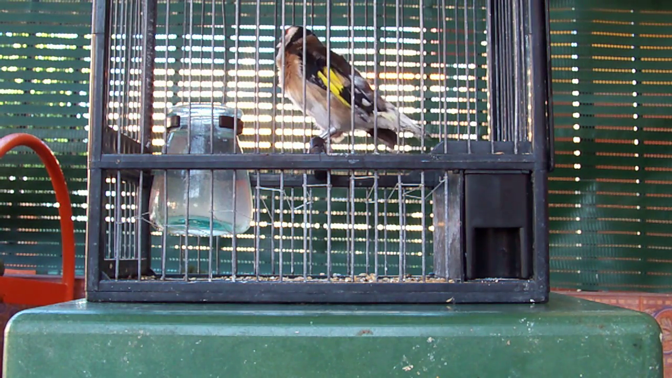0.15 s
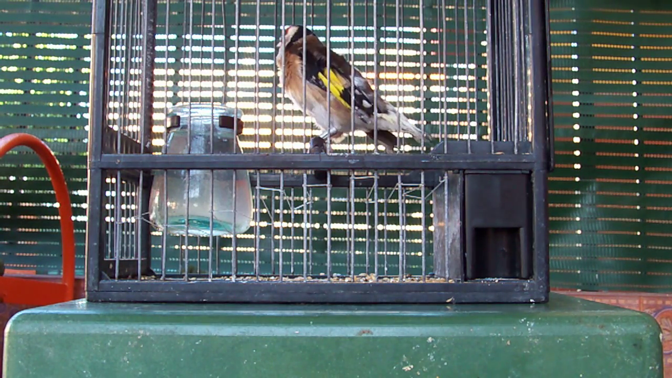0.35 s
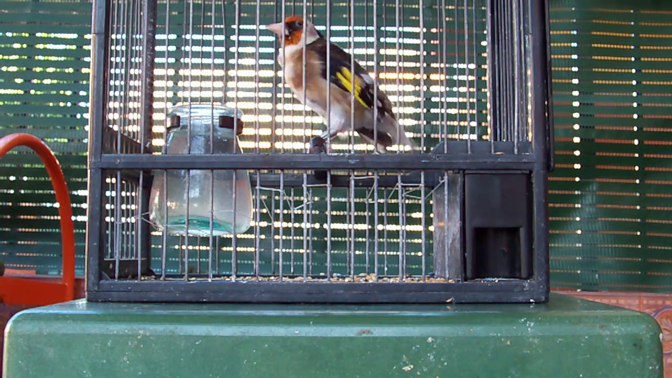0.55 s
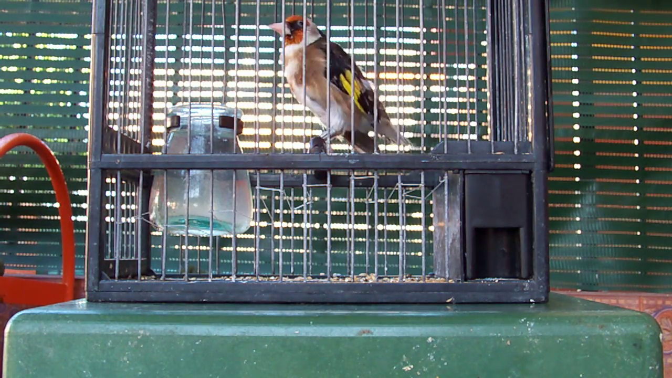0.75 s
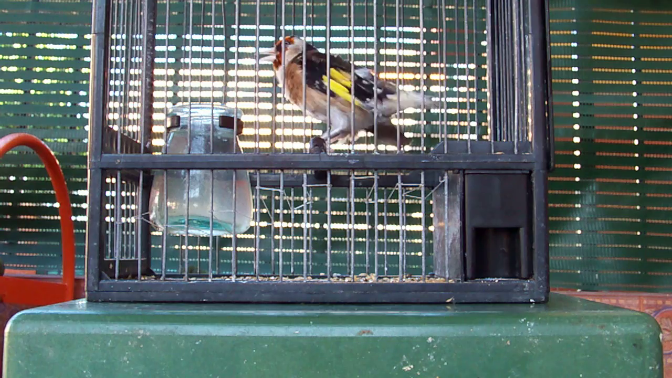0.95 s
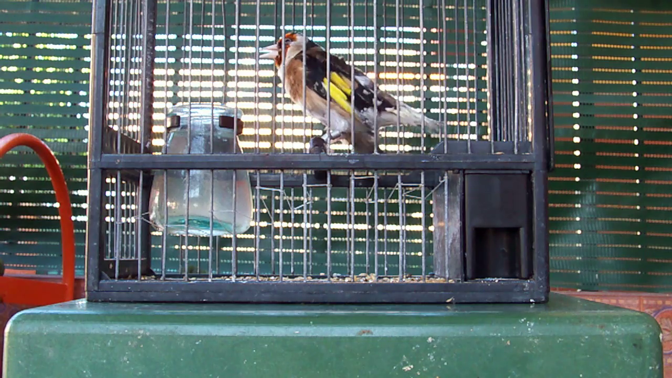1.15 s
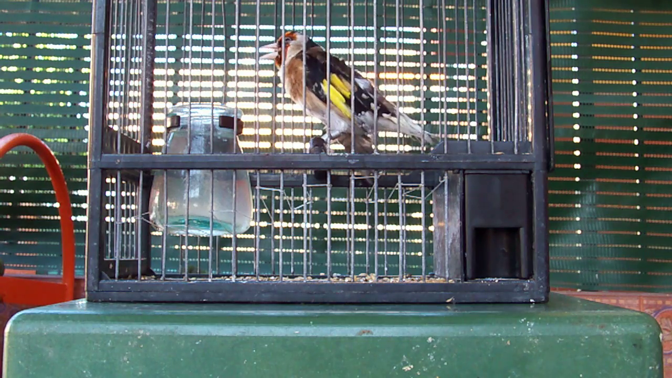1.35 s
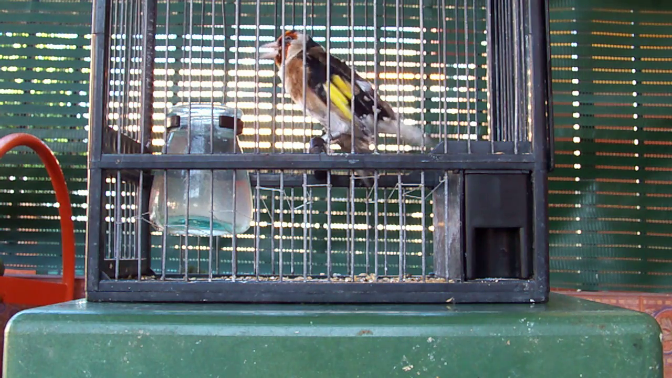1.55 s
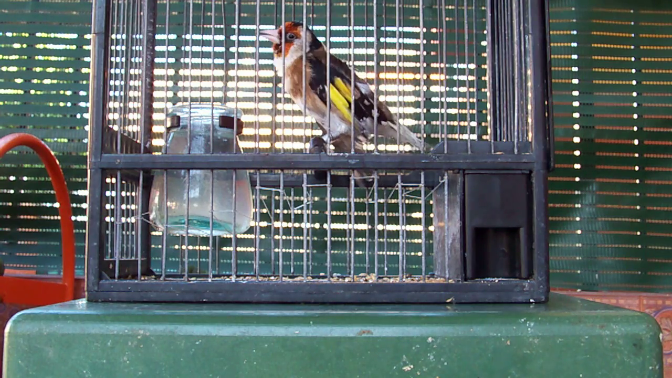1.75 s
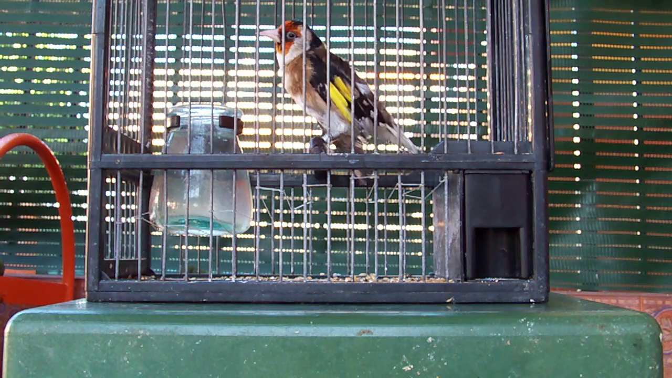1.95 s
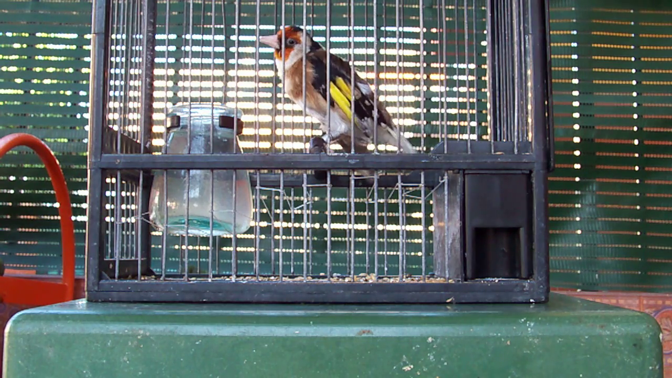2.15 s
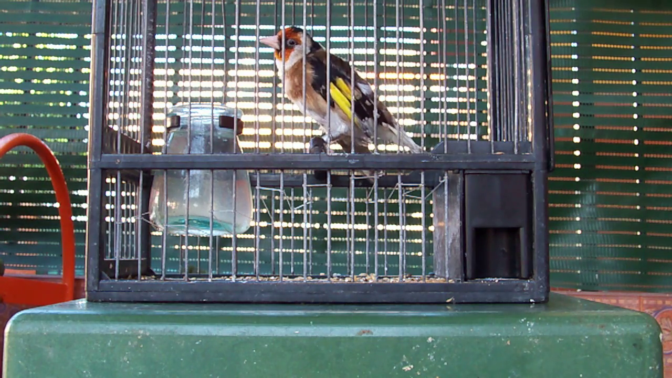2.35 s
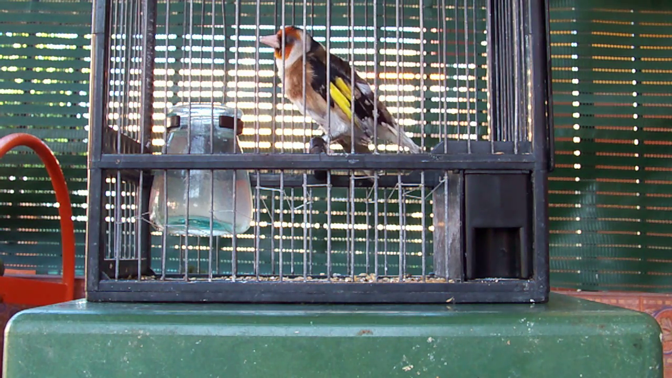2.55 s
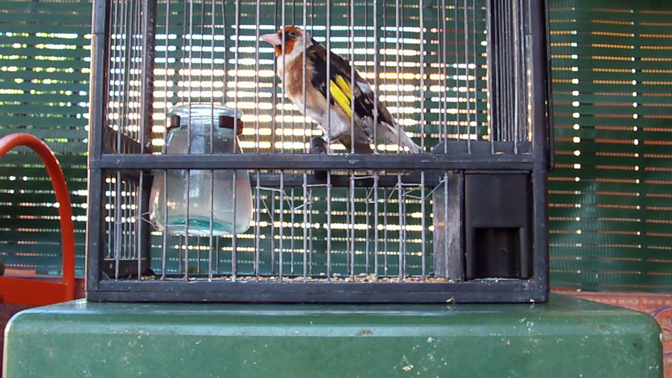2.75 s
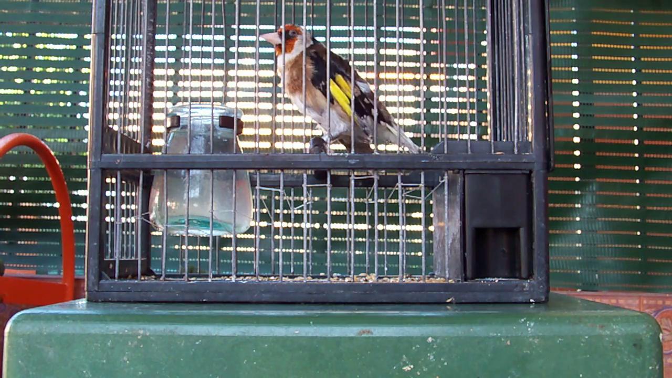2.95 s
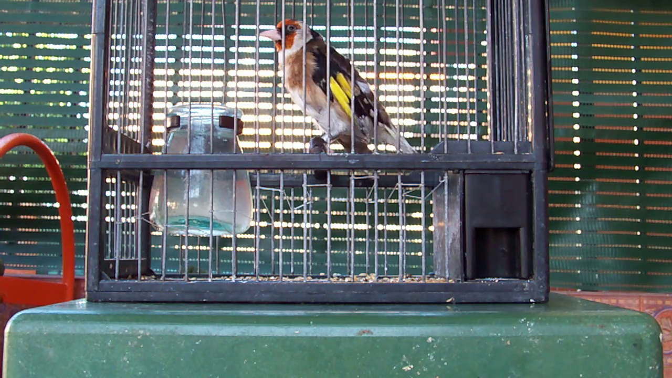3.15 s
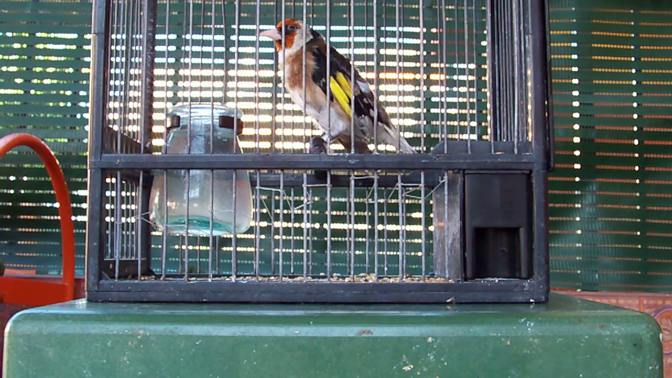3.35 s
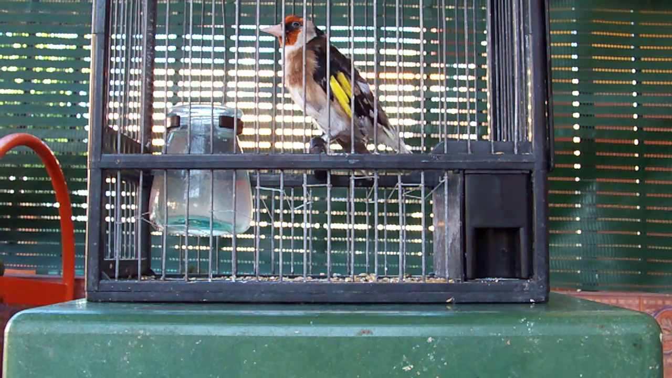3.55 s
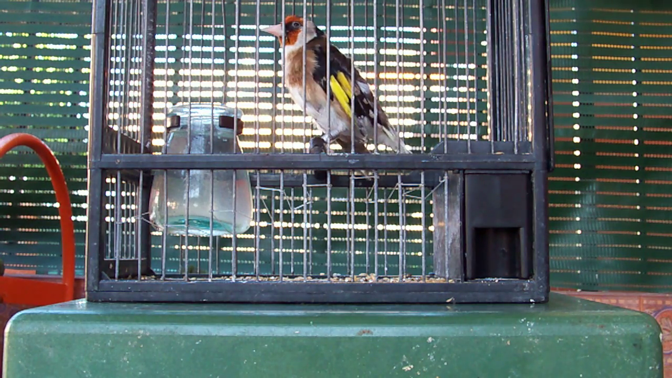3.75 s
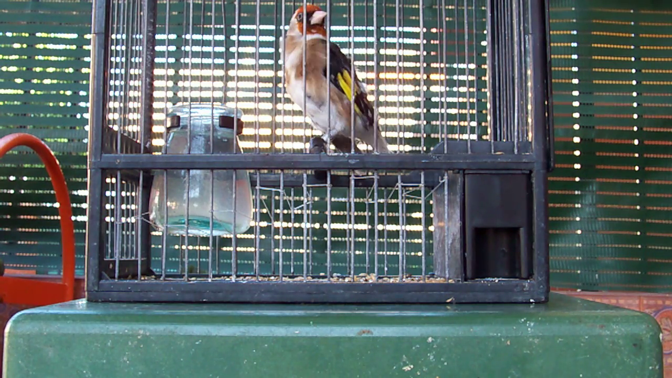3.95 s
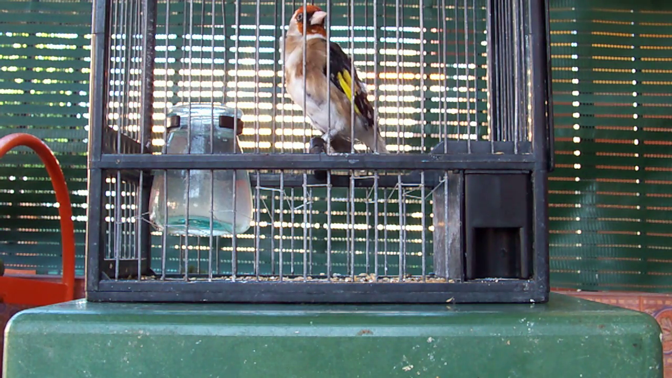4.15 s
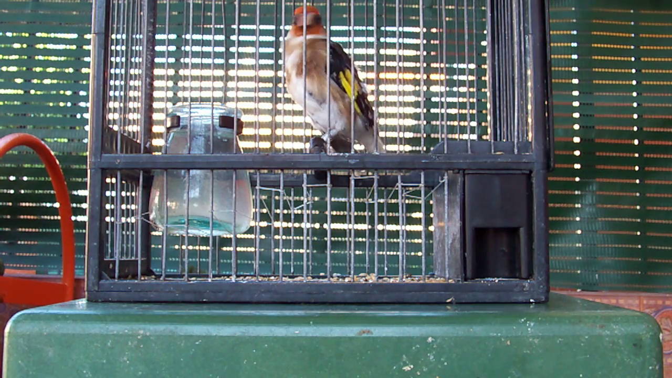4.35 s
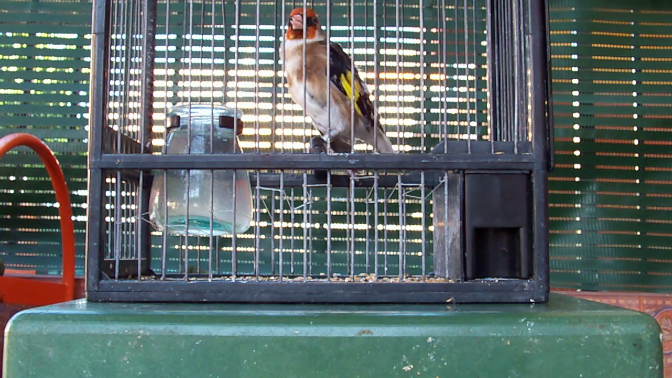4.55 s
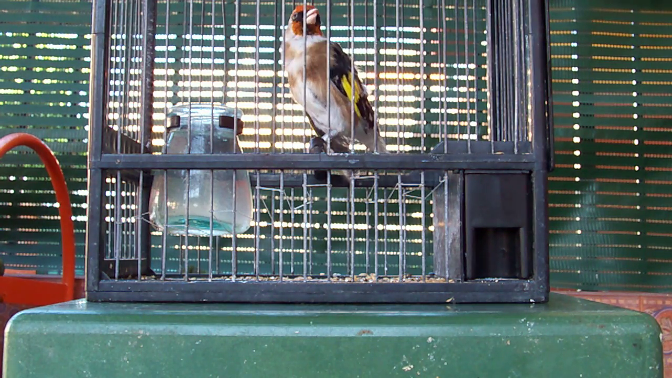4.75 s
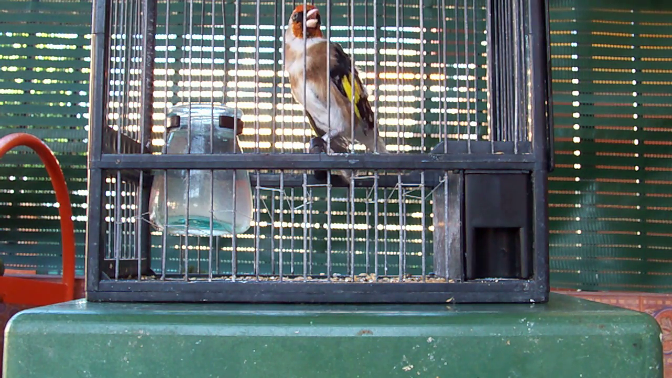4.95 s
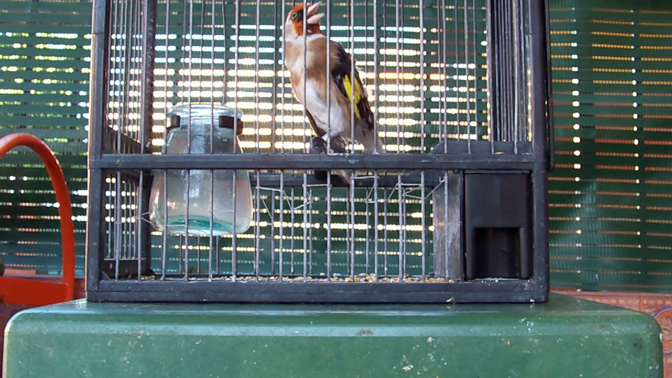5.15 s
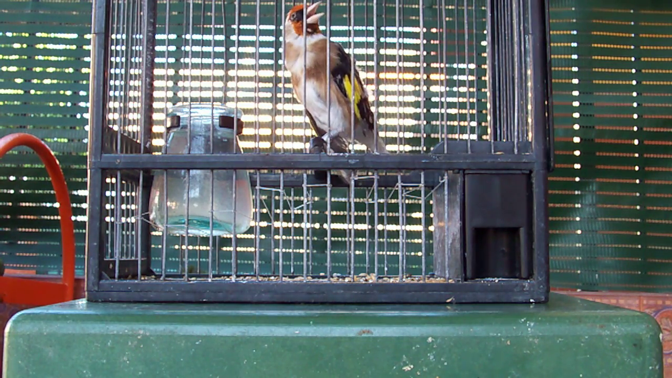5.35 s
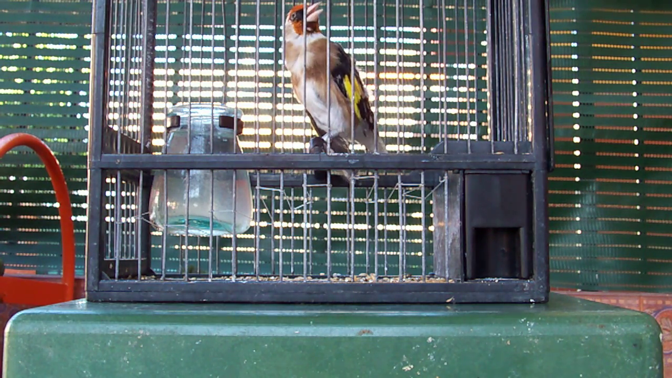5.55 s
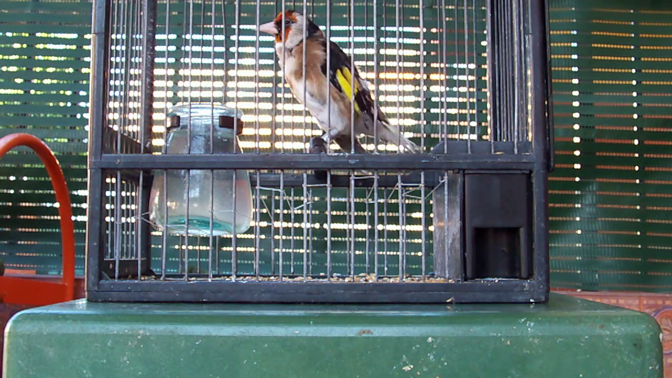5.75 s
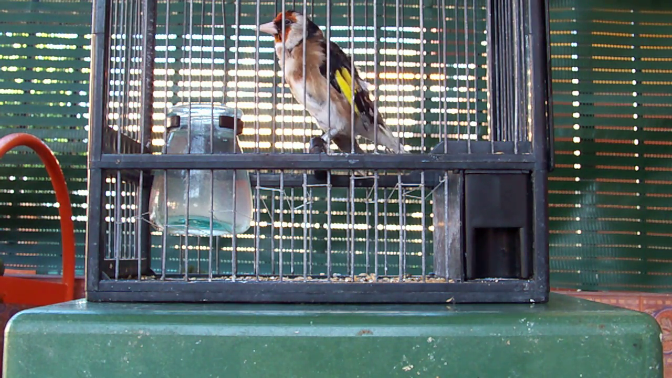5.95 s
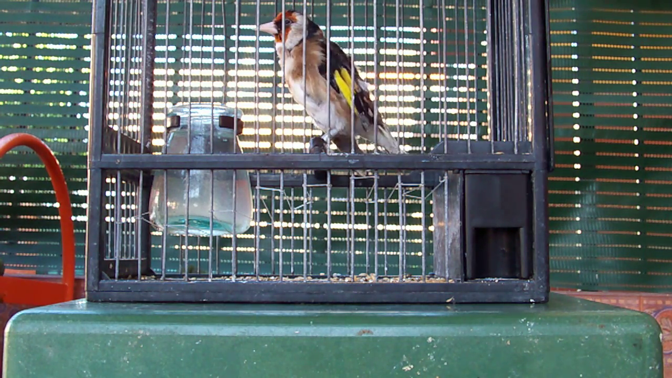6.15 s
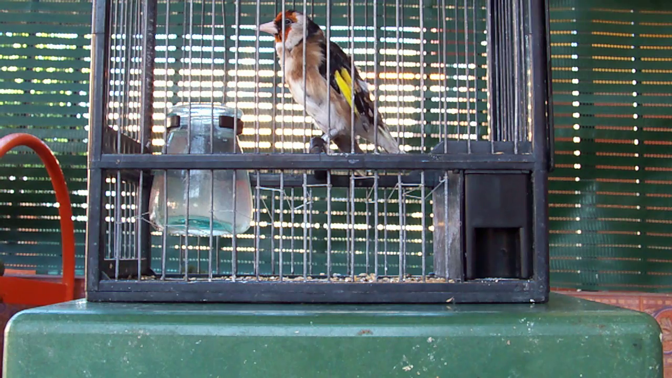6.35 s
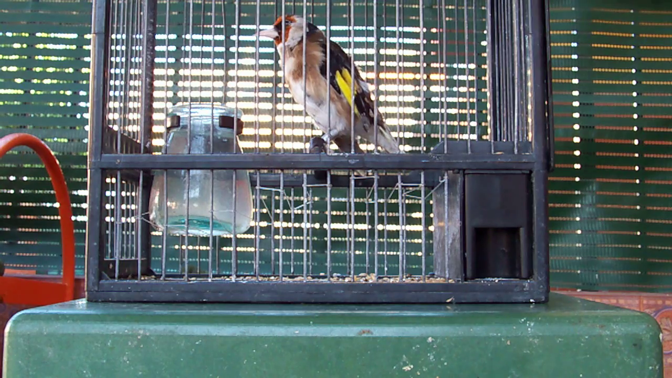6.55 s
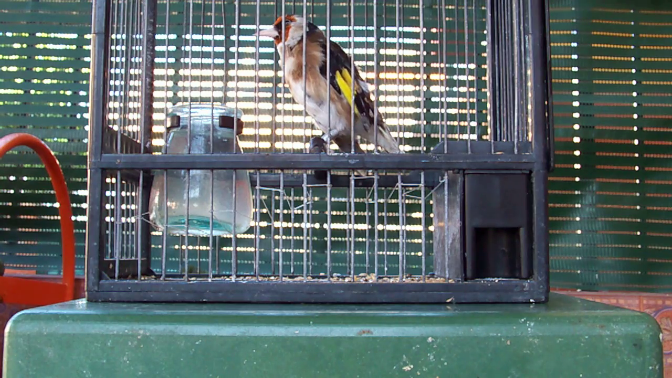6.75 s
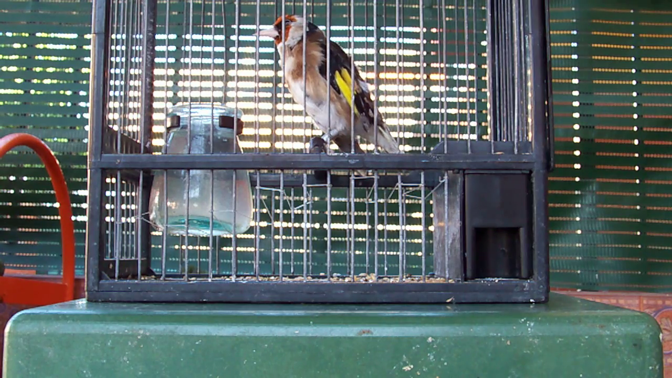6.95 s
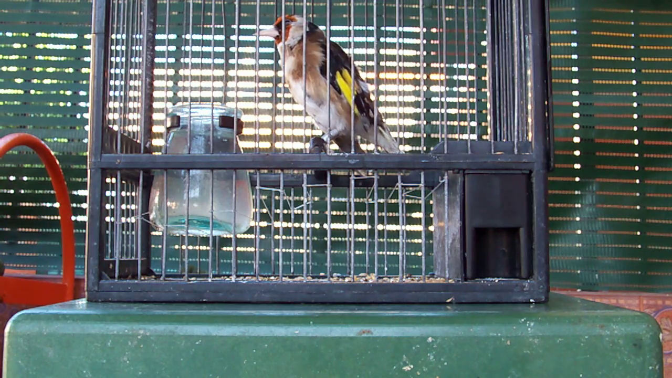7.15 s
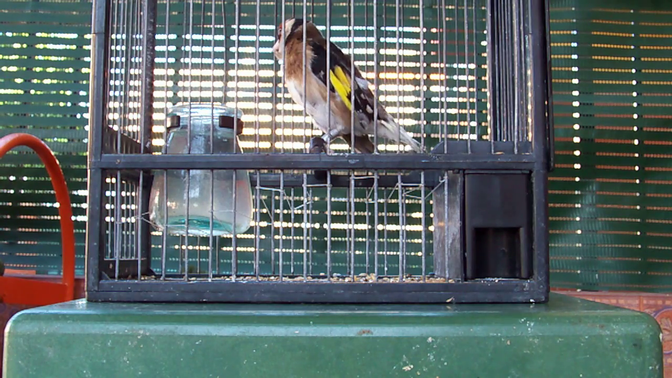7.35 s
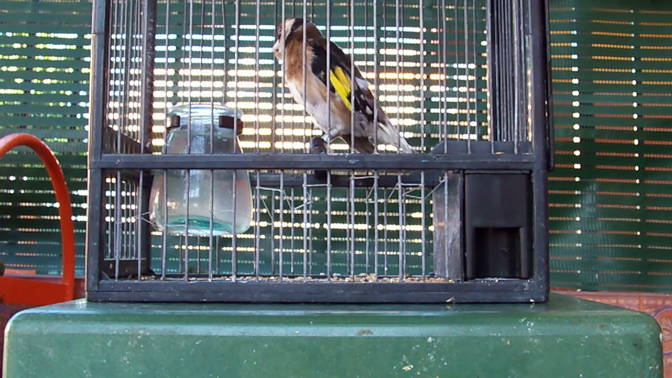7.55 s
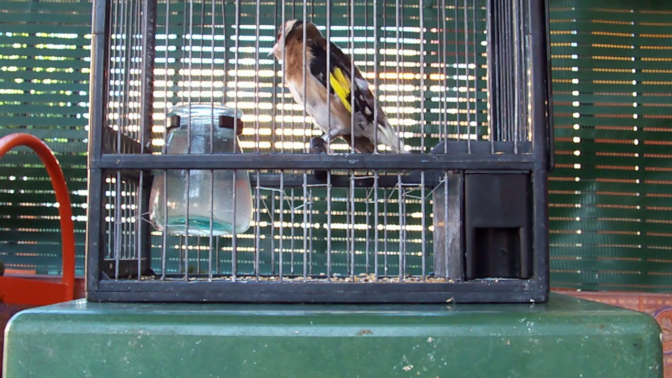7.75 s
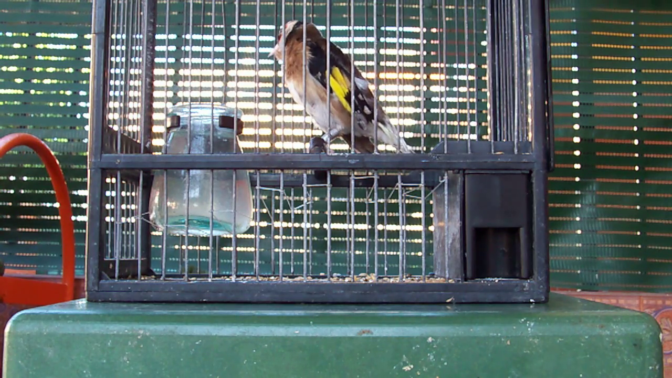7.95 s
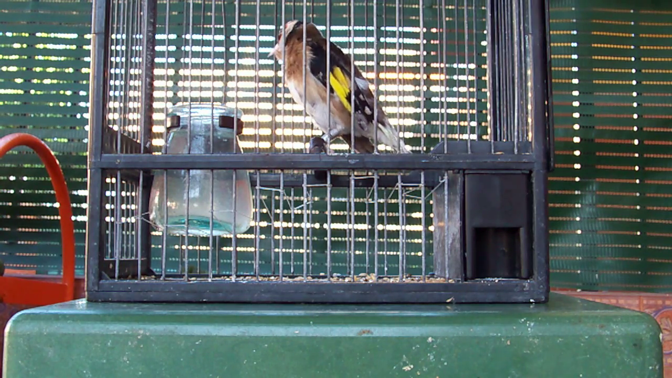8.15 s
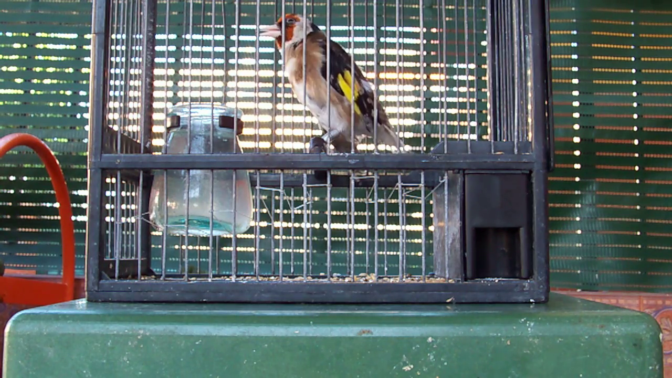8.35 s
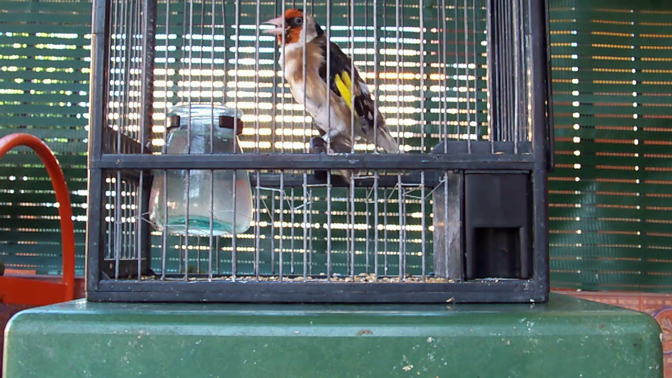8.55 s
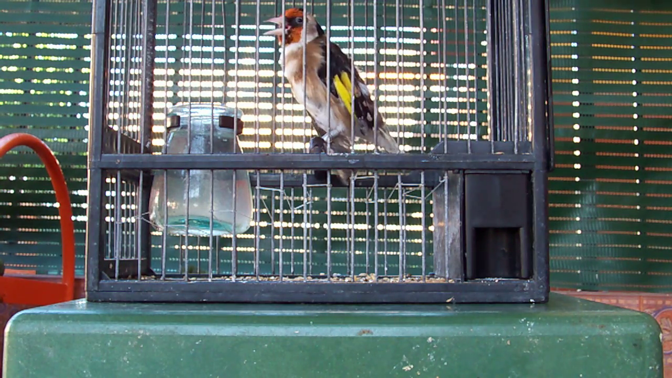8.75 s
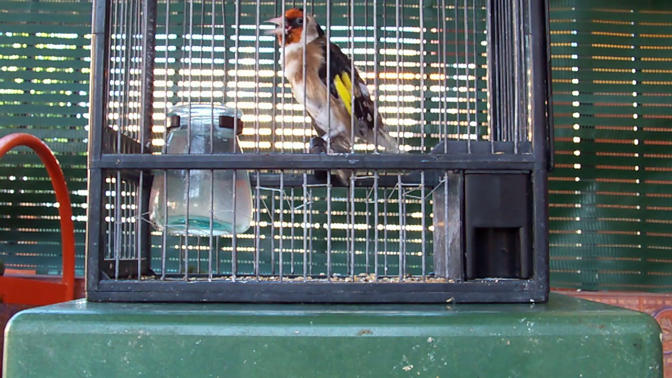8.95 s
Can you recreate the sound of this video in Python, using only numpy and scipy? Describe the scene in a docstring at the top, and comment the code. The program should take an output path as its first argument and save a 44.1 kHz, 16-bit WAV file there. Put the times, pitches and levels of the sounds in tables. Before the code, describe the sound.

A caged finch sings three loud bursts of rapid, high twittering close by, with faint distant bird whistles and a low rumble between.

```python
"""Caged finch, close up

A finch near a stereo microphone gives soft chips, then three bursts of sliding, near-sine syllables.
A second bird whistles far off, a low coo wavers faintly, and traffic-like rumble fills the room.
The song has faint frequency-shifted copies. A faint broadband hiss swells and fades with loud syllables."""
import sys
import numpy as np
from scipy import signal
from scipy.fft import rfft, irfft, next_fast_len
from scipy.io import wavfile
from scipy.ndimage import uniform_filter1d

SR = 44100
rng = np.random.default_rng(int(sys.argv[2]) if len(sys.argv) > 2 else 0)


def digitize_waveform(pressure):
    """Quantize a signal to 16-bit integers and store it at the path in sys.argv[1].

    Rows of a 2-D input are taken as channels; values are limited to [-1, 1].
    """
    field = np.atleast_2d(pressure).T
    bounded = np.clip(field, -1, 1)
    quanta = np.round(bounded * 32767).astype(np.int16)
    wavfile.write(sys.argv[1], SR, quanta)


N = 401310

# Syllable contours: time_s, pitch_hz, relative_db
CHIP = [(0, 5200, -36), (.002, 5250, -3.5), (.005, 5450, 1), (.007, 5800, -14.5), (.010, 6900, -13.5),
        (.013, 7600, -21)]
RISE = [(0, 5320, -45), (.002, 5360, -16), (.005, 5390, -7.5), (.009, 5660, -1), (.013, 5990, -5),
        (.016, 6670, -6.5), (.019, 7040, -17), (.028, 7840, -38)]
TWIN_WEAK = [(0, 3600, -28.5), (.001, 3950, -8.5), (.003, 4200, -4), (.008, 5100, -11), (.011, 5610, -10.5),
             (.016, 6200, -13), (.023, 6150, -10.5), (.031, 5950, -9.5), (.04, 5900, -28)]
TWIN_STRONG = [(0, 3507, -22.5), (.0013, 3703, -2.5), (.003, 4065, 0), (.005, 4680, -5), (.008, 5074, -2.5),
               (.012, 5373, -1), (.016, 5680, -4), (.020, 5955, -8.5), (.027, 5900, -27)]
FALL = [(0, 7844, -38.5), (.003, 8020, -28), (.006, 7377, -12.5), (.009, 6705, 2.5), (.011, 6375, -5),
        (.014, 6130, -6.5), (.0205, 5858, -10.5), (.023, 5774, -34)]
SWOOP = [(0, 2170, -39.5), (.005, 2314, -39.5), (.009, 2776, -23), (.012, 3431, -9), (.015, 4335, -2.5),
         (.018, 4740, -4.5), (.024, 5290, -1.5), (.032, 5542, -0.5), (.038, 5459, -6.5), (.042, 5450, -8.5),
         (.045, 5410, -34)]
SLUR = [(0, 2812, -45), (.012, 3197, -10.5), (.019, 3566, -1.5), (.025, 3693, -7), (.031, 3907, -12),
        (.039, 4463, -4.5), (.046, 4784, 0), (.052, 4590, -4), (.058, 4536, -4.5), (.061, 4554, -36.5)]
# Soft calls: start_s, effort_db, pan_db (left minus right)
CHIPS = [(.1605, -37.5, -1.5), (0.179, -37.5, -1), (0.464, -33, -1.5)]
# Burst openings: start_s, rise_effort_db, rise_pan_db, twin_after_s, twin_effort_db, twin_pan_db
OPENINGS = [(.865, -5.5, -3.5, 0.081, -7.5, 0.1), (4.5152, -7, -1.5, .0796, -5, 1.1),
            (8.2433, -9.5, -2, .0815, -8.5, -1.3)]
# Repeats: start_s, effort_db, fall_pan_db, swoop_after_s, swoop_pan_db, slur_after_s, slur_pan_db
MOTIFS = [(1.0170, -7.5, -5, .0140, 1, 0.073, 3), (1.1795, -7.5, -4.5, .0155, 3.5, .0725, 2.5),
          (1.3399, -7.5, -3, .0153, 4.5, .0740, 3), (1.5027, -7, -3, .0153, 7.5, .0746, 3.5),
          (1.669, -7.5, -3.5, .0153, 6, .0766, 7.5), (4.67, -5, -3, .0122, 10, .0712, 3),
          (4.8300, -5, -5, 0.013, 6.5, .0730, 5), (4.9923, -5, -2.24, .0151, 6.5, .0736, 8),
          (5.1567, -5.5, -2, .0154, 10.5, .0714, 10), (5.32, -6.5, 0.2, .0150, 5.5, 0.074, 8),
          (5.4999, -6, -4.5, 0.015, 1, .0751, 6), (8.4016, -6, -6.5, 0.014, 8, .0731, 1.5),
          (8.5655, -6, -8.5, .0148, 1.1, .0721, 1.6), (8.7288, -6.2, -8, .0146, 1.5, .0741, 3.25),
          (8.8923, -6, -5.5, .0145, 4.5, .0760, 7), (9.0572, -6.5, -9, .0176, 7, .0750, 3)]
WEAK_LEAD_S, WEAK_DB = 0.0069, -3.5
FALL_DB, SWOOP_DB, SLUR_DB = 0.4, 0.43, 0.72  # added to effort
SWOOP_SAG_PER_S, SLUR_SAG_PER_S = .017, .043  # fraction of pitch
SWOOP_LIFT, LIFT_FADE_S = 0.11, .09  # swoops start sharp, then settle
TICK_AFTER_S = .0087


def finch():
    """Chips, then bursts: a rise, a two-voiced twin and a repeated fall, swoop and slur."""
    song = np.zeros((2, N))
    ticks = np.zeros((2, N))
    for start_s, effort_db, pan_db in CHIPS:
        add(song, start_s, syllable(CHIP, effort_db, pan_db, overtone_db=-20))
    for start_s, rise_db, rise_pan_db, twin_after_s, twin_db, twin_pan_db in OPENINGS:
        add(song, start_s, syllable(RISE, rise_db, rise_pan_db, overtone_db=-19.5))
        twin_s = start_s + twin_after_s
        weak = syllable(TWIN_WEAK, twin_db + WEAK_DB, twin_pan_db, overtone_db=-21)
        add(song, twin_s - WEAK_LEAD_S, weak)
        add(song, twin_s, syllable(TWIN_STRONG, twin_db, twin_pan_db, overtone_db=-20))
    for start_s, effort_db, pan_db, swoop_after_s, swoop_pan_db, slur_after_s, slur_pan_db in MOTIFS:
        sung_s = min(start_s - opening_s for opening_s, *_ in OPENINGS if opening_s < start_s)
        swoop_ratio = 1 - SWOOP_SAG_PER_S * sung_s + SWOOP_LIFT * np.exp(-sung_s / LIFT_FADE_S)
        slur_ratio = 1 - SLUR_SAG_PER_S * sung_s
        fall = syllable(FALL, effort_db + FALL_DB, pan_db, overtone_db=-19.5)
        swoop = syllable(SWOOP, effort_db + SWOOP_DB, swoop_pan_db, overtone_db=3, ratio=swoop_ratio)
        slur = syllable(SLUR, effort_db + SLUR_DB, slur_pan_db, overtone_db=-25, ratio=slur_ratio)
        add(song, start_s, fall)
        add(ticks, start_s + TICK_AFTER_S, tick(effort_db + FALL_DB, pan_db))
        add(song, start_s + swoop_after_s, swoop)
        add(song, start_s + slur_after_s, slur)
    return song + ticks + reflections(song)


# Throat response to the second harmonic: harmonic_hz, gain_db
THROAT = [(4200, 7), (4700, 13), (5400, 15), (6000, -6.5), (6600, -36), (16000, -62.5)]
# Microphone phase difference: freq_hz, left_lead_rad
MIC_PHASE = [(2800, -0.69), (4100, -0.63), (4650, -1.884), (5900, -1.06), (6500, -1.59), (8100, 0.89)]
# Microphone level difference: freq_hz, pan_db
MIC_TILT = [(2800, -2.1), (3500, -2.4), (4200, 6), (4700, -1.5), (5500, -3.8), (6500, 3), (8000, -0.9)]
TURN_LOSS_DB_PER_DB = .45  # level lost with pan as the head turns aside


def syllable(contour, effort_db, pan_db, overtone_db, ratio=1):
    """A sliding sine with an overtone that the throat passes only at low pitch."""
    time_s, pitch_hz, relative_db = np.transpose(contour)
    t = np.arange(0, time_s[-1], 1 / SR)
    hz = ratio * uniform_filter1d(np.interp(t, time_s, pitch_hz), size=30)
    contour_db = uniform_filter1d(np.interp(t, time_s, relative_db), size=30)
    level_db = effort_db - TURN_LOSS_DB_PER_DB * abs(pan_db) + contour_db
    envelope = gain_of(level_db) * signal.windows.tukey(len(t), .05)
    phase = 2 * np.pi * (np.cumsum(hz) / SR + rng.random())
    side = np.array([[.5], [-.5]])
    balance = gain_of(side * (pan_db + lookup(MIC_TILT, hz)))
    fundamental = np.sin(phase + side * lookup(MIC_PHASE, hz))
    overtone = np.sin(2 * phase + side * lookup(MIC_PHASE, 2 * hz))
    return envelope * balance * (fundamental + gain_of(overtone_db + lookup(THROAT, 2 * hz)) * overtone)


def tick(effort_db, pan_db, offset_db=-22, width_s=.00013, centre_hz=2500):
    """A dry, broad click at the crest of a fall."""
    t = np.arange(-40, 41) / SR
    click = np.exp(-(t / width_s) ** 2) * np.sin(2 * np.pi * centre_hz * t)
    peak_db = effort_db - TURN_LOSS_DB_PER_DB * abs(pan_db) + offset_db
    return gain_of(peak_db + np.array([[.5], [-.5]]) * pan_db) * click / abs(click).max()


# Colour of reflected sound: freq_hz, gain_db
ROOM_COLOUR = [(3000, -0.5), (3600, 0), (4050, -5), (4600, 4), (5500, 0.5), (6000, 4), (6600, -2),
               (7500, -3.5)]
# Early echoes: nominal_delay_s, gain_db
ECHOES = [(.0031, -18), (.0062, -11.5), (0.0095, -19.5), (0.018, -12)]


def reflections(song, tail_db=-13):
    """Echoes off cage, shutters and walls, timed differently in each channel, plus the room's tail."""
    mono = filtered(song.mean(0), lambda hz: gain_of(lookup(ROOM_COLOUR, hz)))
    echoes = np.zeros((2, N))
    for delay_s, gain_db in ECHOES:
        for channel in echoes:
            add(channel, delay_s * rng.uniform(0.57, 1.1), gain_of(gain_db) * mono)
    return echoes + gain_of(tail_db) * reverb(mono, t60_scale=0.73, predelay_s=0.0031)


# Room decay: freq_hz, base_t60_s
ROOM_DECAY = [(2500, 0.26), (4500, 0.5), (6600, 0.45), (9000, 0.25)]


def reverb(mono, t60_scale, predelay_s, sway_hz=2.3):
    """Sparse taps decaying by band; three tails take turns, as the singer never holds quite still."""
    size, step = SR // 2, 20
    out = np.zeros((2, N))
    sway = np.pi * sway_hz * np.arange(N) / SR
    for k in range(3):
        slots = np.arange(round(predelay_s * SR), size - step, step)
        positions = slots + rng.integers(0, step, (2, size))[:, :len(slots)]
        signs = rng.choice([-1., 1.], (2, size))[:, :len(slots)]
        taps = np.zeros((2, size))
        np.put_along_axis(taps, positions, signs, 1)
        hz, t, spectra = signal.stft(taps, SR, nperseg=128)
        t60_s = t60_scale * lookup(ROOM_DECAY, hz)[:, None]
        tail = signal.istft(spectra * gain_of(-60 * t / t60_s), SR, nperseg=128)[1]
        tail /= np.linalg.norm(tail[0])
        crossfade = np.sqrt(2 / 3) * np.cos(sway + k * np.pi / 3)
        out += signal.oaconvolve((mono * crossfade)[None], tail, axes=1)[:, :N]
    return out


# Evenly repeated notes: first_s, until_s, period_s, length_s, start_hz, end_hz, level_db, rasp_hz
FAR_SERIES = [(.012, .708, 0.17, 0.13, 4230, 4587, -62, 130.2),
              (.282, .804, 0.17, 0.097, 5730, 5580, -61.5, 89.8),
              (.11, .806, 0.16, 0.083, 4830, 4850, -66.5, 125.),
              (1.953, 2.275, 0.15, 0.093, 2590, 2578, -66, 39.9),
              (2.052, 2.366, .157, .09, 4300, 4243, -58.5, 69.7),
              (2.052, 2.366, 0.15, 0.06, 3477, 3425, -61, 60.1),
              (2.455, 3.05, 0.1, .1, 5814, 5287, -61.1, 596)]
# Single notes: start_s, length_s, start_hz, end_hz, level_db, rasp_hz
FAR_NOTES = [(0, .06, 3300, 3250, -65, 119.4), (0, 0.069, 3850, 3981, -66, 159),
             (0.095, .05, 5500, 5500, -65, 150.), (3.244, .1, 5800, 5300, -65.5, 500.),
             (3.249, .084, 4900, 4900, -59.5, 201), (3.283, .11, 4150, 3806, -61.5, 324.),
             (3.338, .09, 3500, 3030, -60.5, 350.), (3.398, .12, 2813, 2550, -63.5, 331)]
# Long note under the trill: start_s, length_s, start_hz, end_hz, level_db, rasp_hz
WHISTLE = (2.5, 0.63, 3951, 4086, -62, 25.5)


def far_bird(throb_hz=23, throb_depth=.7, swell_db=3):
    """Distant, reverberant notes, a trill over a throbbing whistle, and a raspy descent."""
    song = np.zeros((2, N))
    for first_s, until_s, period_s, *note in FAR_SERIES:
        for start_s in np.arange(first_s, until_s + period_s / 2, period_s):
            add(song, start_s, far_note(*note))
    for start_s, *note in FAR_NOTES:
        add(song, start_s, far_note(*note))
    start_s, *note = WHISTLE
    whistle = far_note(*note)
    t = np.arange(whistle.shape[1]) / SR
    throb = 1 - throb_depth * np.sin(np.pi * throb_hz * t) ** 2
    add(song, start_s, whistle * throb * gain_of(swell_db * t / t[-1]))
    return song + gain_of(-1) * reverb(song[0], t60_scale=1.05, predelay_s=.003)


def far_note(length_s, start_hz, end_hz, level_db, rasp_hz, blur_hz=33):
    """A note blurred by distance; it slides early and fades as it sounds."""
    progress = np.linspace(0, 1, round(length_s * SR))
    edges = signal.windows.tukey(len(progress), 0.035 / length_s)
    tone = fuzzy_tone(start_hz + (end_hz - start_hz) * progress ** 0.55, rasp_hz + blur_hz)
    return gain_of(level_db - 0.47 * progress / length_s) * edges * tone


# Low calls: start_s, length_s, start_hz, end_hz, level_db
COOS = [(0, 0.99, 518, 532, -62.5), (2.05, .6, 477.4, 508, -64), (2.7, 0.35, 495, 463, -64),
        (3.95, 0.51, 479.7, 530, -66), (6.35, 0.68, 525, 582, -64.5), (7.02, 1.05, 462, 546, -64.5),
        (8.1, 0.44, 589, 595, -63.5)]


def coo(swell_db=1, throb_hz=3.5, throb_depth=0.54):
    """Faint low calls that slide, throb and swell slightly."""
    out = np.zeros((2, N))
    for start_s, length_s, start_hz, end_hz, level_db in COOS:
        progress = np.linspace(0, 1, round(length_s * SR))
        arch_db = swell_db * (np.sin(np.pi * progress ** 0.84) - 1)
        envelope = gain_of(level_db + arch_db) * signal.windows.tukey(len(progress), .15)
        tone = fuzzy_tone(start_hz + (end_hz - start_hz) * progress ** .6, width_hz=22)
        throb_phase = np.pi * throb_hz * length_s * progress + 2 * np.pi * rng.random()
        add(out, start_s, tone * envelope * (1 - throb_depth * np.sin(throb_phase) ** 2))
    return out


# Background spectrum: freq_hz, relative_density_db
RUMBLE_SPECTRUM = [(12, -33.5), (20, -5), (92, -8.5), (119, -13), (252, -21), (292, -45), (331, -27),
                   (508, -21.5), (652, -26.5), (703, -23.5), (950, -30.5), (1050, -27), (3590, -31.5),
                   (6880, -40), (8000, -53.5), (10400, -86.5), (17600, -120)]
# Stereo likeness: freq_hz, coherence
RUMBLE_COHERENCE = [(60, 0.69), (160, 0.81), (420, 0.66), (1130, 0.61), (2990, 0.3), (7950, 0.73)]
# Deep swells: time_s, relative_db
GUSTS = [(0.0, -56), (1.39, -58.5), (1.54, -59.5), (3.45, -56.5), (4.87, -60), (4.99, -63.5), (5.6, -58),
         (6.11, -58.5), (6.26, -52.5), (7.58, -55.5), (8.079, -48.5), (8.39, -58.5), (9.1, -58.5)]


def rumble(level_db=-52.5, patch_db=.8, gust_corner_hz=94):
    """Traffic-like noise with soft patches and slow swells in the bass."""
    size, hop = 2048, 512
    frames = N // hop + 5
    hz = np.fft.rfftfreq(size, 1 / SR)
    left_re, left_im, other_re, other_im, patches = rng.standard_normal((frames, len(hz), 5)).T
    patches = unit_rms(uniform_filter1d(uniform_filter1d(patches, 16, 0), 8, 1))
    time_s, relative_db = np.transpose(GUSTS)
    gust_db = np.interp(np.arange(frames) * hop / SR, time_s, relative_db - relative_db.mean())
    bass_gust_db = gust_db / (1 + (hz[:, None] / gust_corner_hz) ** 4)
    coherence = lookup(RUMBLE_COHERENCE, hz)[:, None]
    left = left_re + 1j * left_im
    right = coherence * left + np.sqrt(1 - coherence ** 2) * (other_re + 1j * other_im)
    gain = gain_of(lookup(RUMBLE_SPECTRUM, hz)[:, None] + patch_db * patches + bass_gust_db)
    noise = signal.istft(np.array([left, right]) * gain, nperseg=size, noverlap=size - hop)[1]
    return gain_of(level_db) * unit_rms(noise[:, :N])


# Drone partials: pitch_hz, width_hz, level_db
HUM = [(44, 2.2, -62), (89, 5.3, -58.5), (131, 3.3, -72.5)]


def hum():
    """A motor-like mono drone of narrow noise bands."""
    return sum(gain_of(db) * fuzzy_tone(np.full(N, hz), width_hz)[0] for hz, width_hz, db in HUM)


def fuzzy_tone(hz, width_hz):
    """Narrow noise on a pitch curve, partly shared between channels."""
    pole = np.exp(-np.pi * width_hz / SR)
    settle = SR // 20
    noise = rng.standard_normal((3, len(hz) + settle, 2)) @ [1, 1j]
    envelope = noise[0] + .6 * noise[1:]
    for _ in range(2):
        envelope = signal.lfilter([1], [1, -pole], envelope)
    carrier = np.exp(2j * np.pi * np.cumsum(hz) / SR)
    return unit_rms((envelope[:, settle:] * carrier).real)


def gain_of(db):
    """Decibels to amplitude."""
    return 10 ** (np.asarray(db) / 20)


def unit_rms(x):
    """Scales to rms 1."""
    return x / np.sqrt(np.mean(x ** 2) + 1e-20)


def lookup(table, hz):
    """Interpolates on a log-frequency axis."""
    freq_hz, value = np.transpose(table)
    return np.interp(np.log(hz + 1), np.log(freq_hz + 1), value)


def add(mix, start_s, sound):
    """Mixes a sound in place."""
    part = mix[..., round(start_s * SR):][..., :sound.shape[-1]]
    part += sound[..., :part.shape[-1]]


def filtered(x, gain):
    """Multiplies the spectrum by gain(hz)."""
    size = next_fast_len(N + SR)
    return irfft(rfft(x, size) * gain(np.fft.rfftfreq(size, 1 / SR)), size)[..., :N]


def scene():
    """All sources at the microphone."""
    return finch() + far_bird() + coo() + rumble() + hum()


# Input low-pass: freq_hz, gain_db
INPUT_FILTER = [(7000, 0.), (7500, 2.5), (8000, -2.5), (8400, -30), (9000, -58.5)]
# Image mirrored about MIRROR_HZ: freq_hz, gain_db
MIRROR_GAIN = [(8000, -8), (8600, -21.5), (9500, -51), (10500, -46.5), (11500, -51.5), (13000, -60)]
# Hiss spectrum: freq_hz, relative_density_db
HISS_SPECTRUM = [(100, 2), (1000, -3.5), (3000, 0.5), (8000, -9), (16000, -12.5)]
SHIFT_HZ, MIRROR_HZ, BAND_LIMIT_HZ = 3908, 8000, 15800
HISS_GAIN_DB, SELF_NOISE_DB = -32.5, -84


def record(dry):
    """Shifted copies, input filter, mirror image, hiss swelling with loudness, self-noise, band limit."""
    t = np.arange(N) / SR
    treble = filtered(dry, lambda hz: hz > SHIFT_HZ)
    shifted = treble * gain_of(-29) * np.cos(2 * np.pi * SHIFT_HZ * t)
    lowered = filtered(shifted, lambda hz: (hz < SHIFT_HZ) / (1 + (400 / (hz + 1)) ** 2))  # thin bass
    folded = treble * gain_of(-32) * np.cos(2 * np.pi * (2 * MIRROR_HZ - SHIFT_HZ) * t)
    passed = filtered(dry + lowered + folded, lambda hz: gain_of(lookup(INPUT_FILTER, hz)))
    flipped = passed * 2 * np.cos(4 * np.pi * MIRROR_HZ * t)
    mirror = filtered(flipped, lambda hz: gain_of(lookup(MIRROR_GAIN, hz)) * (hz > MIRROR_HZ))
    loudness = abs(uniform_filter1d(dry ** 2, size=500)) ** 0.52
    noise = filtered(rng.standard_normal((2, N)), lambda hz: gain_of(lookup(HISS_SPECTRUM, hz)))
    hiss = gain_of(HISS_GAIN_DB) * loudness * unit_rms(noise)
    self_noise = gain_of(SELF_NOISE_DB) * rng.standard_normal((2, N))
    lowpass = signal.firwin(511, BAND_LIMIT_HZ, window=("kaiser", 9), fs=SR)
    return signal.oaconvolve(passed + mirror + hiss + self_noise, lowpass[None], "same")


dry = scene()
out = record(dry)
digitize_waveform(out)
```